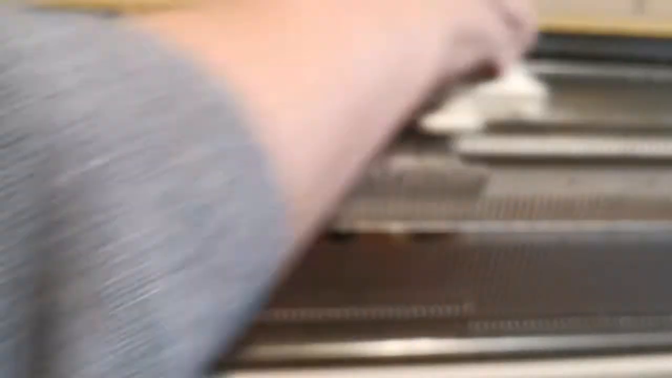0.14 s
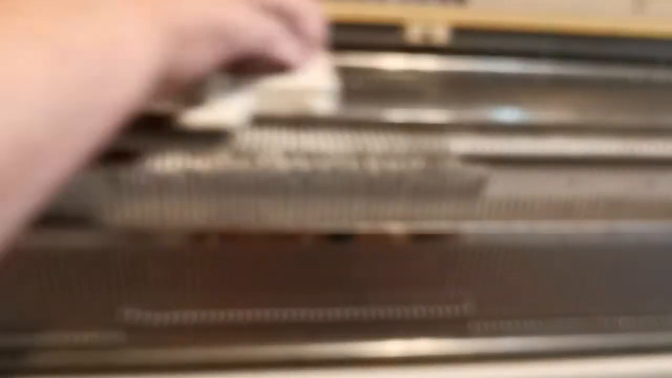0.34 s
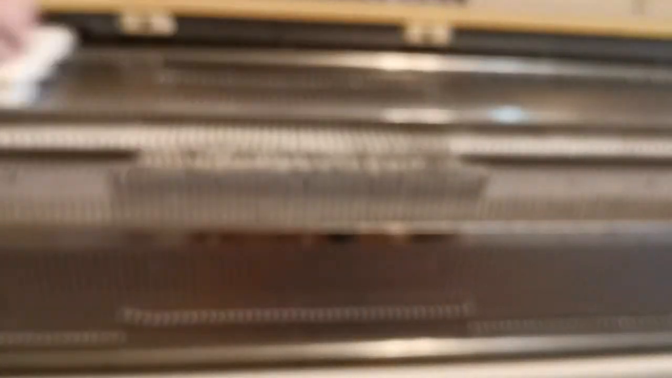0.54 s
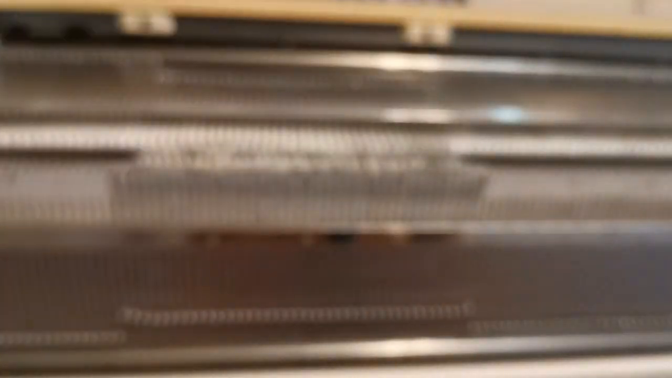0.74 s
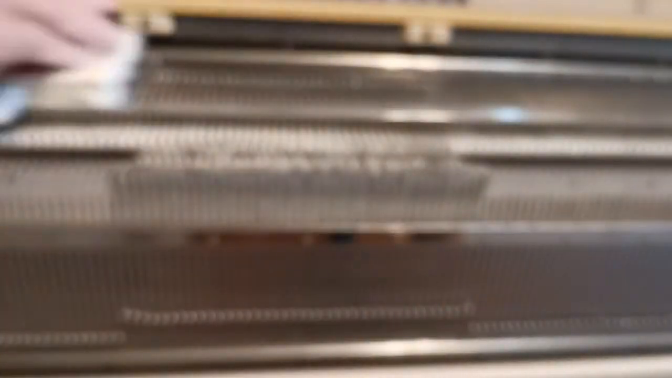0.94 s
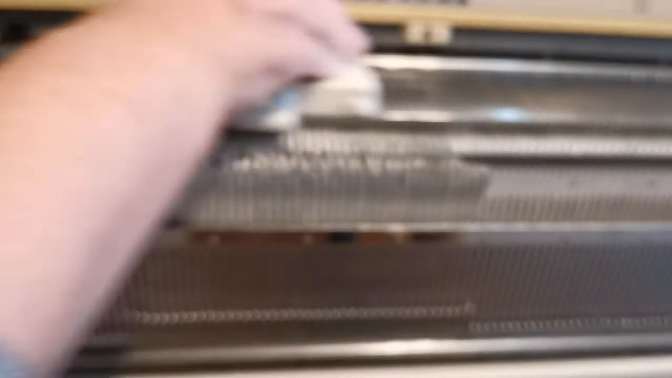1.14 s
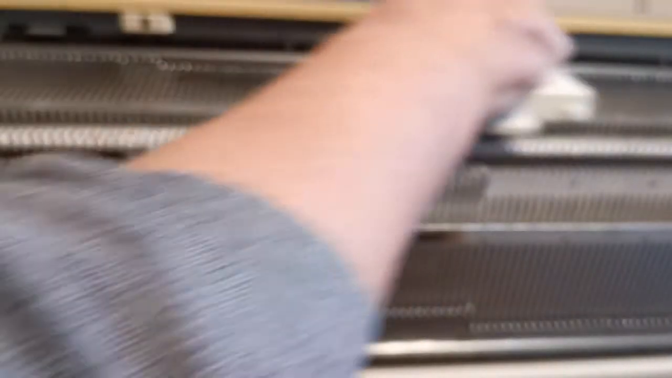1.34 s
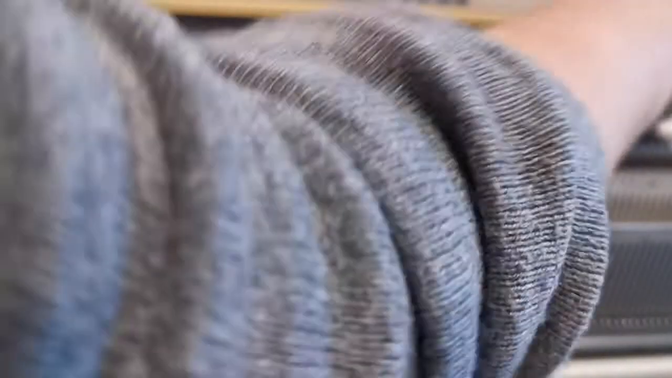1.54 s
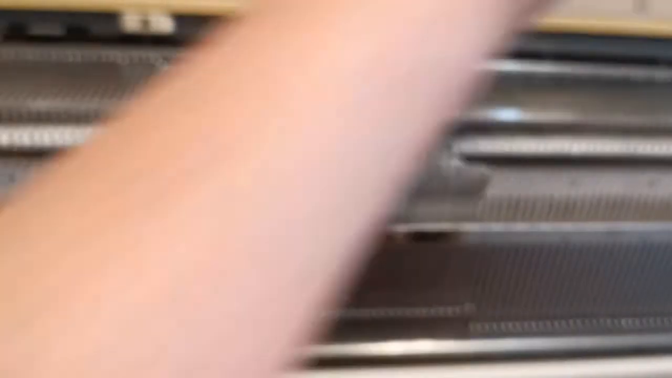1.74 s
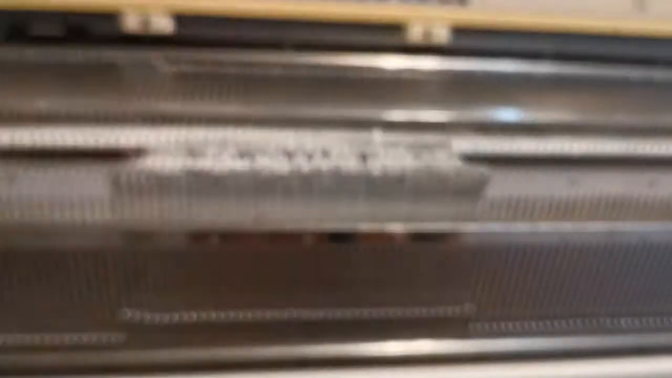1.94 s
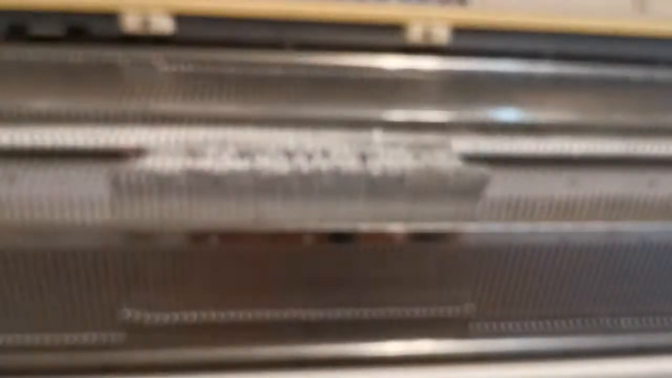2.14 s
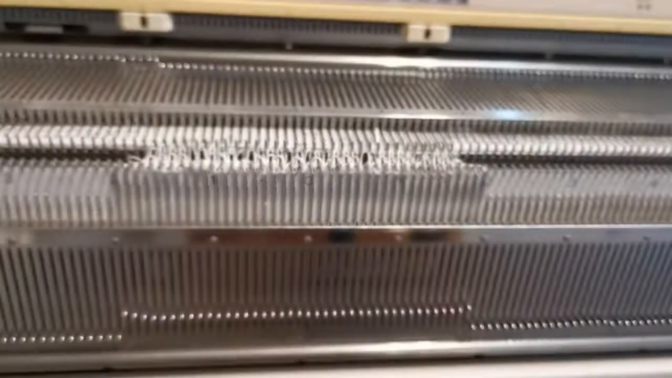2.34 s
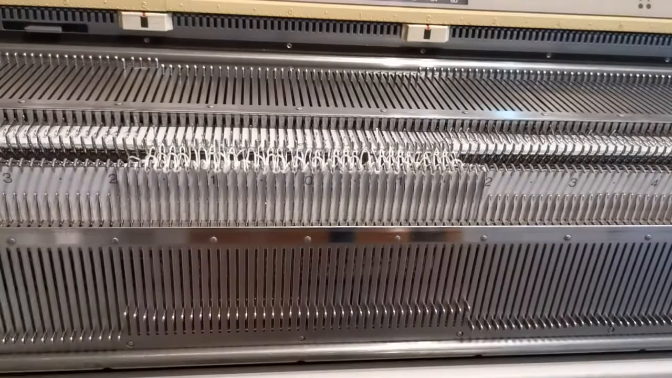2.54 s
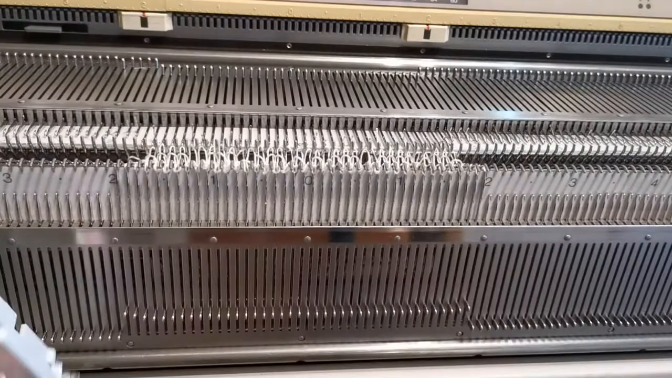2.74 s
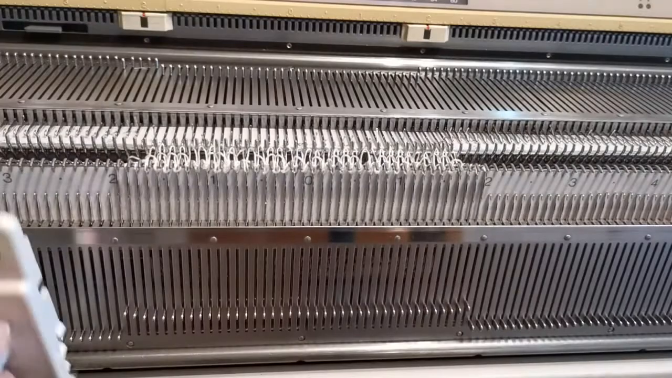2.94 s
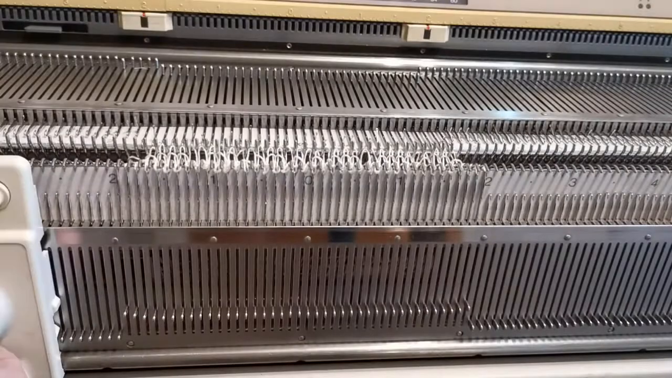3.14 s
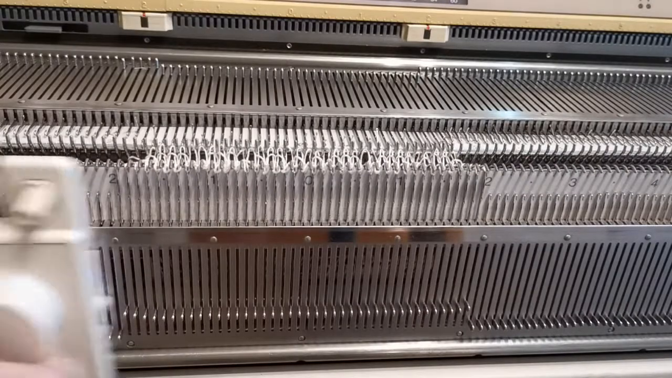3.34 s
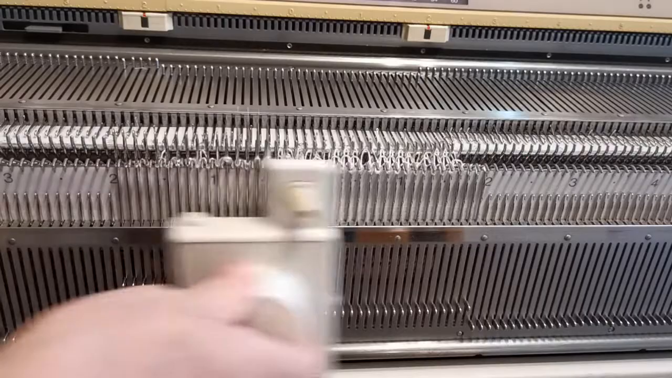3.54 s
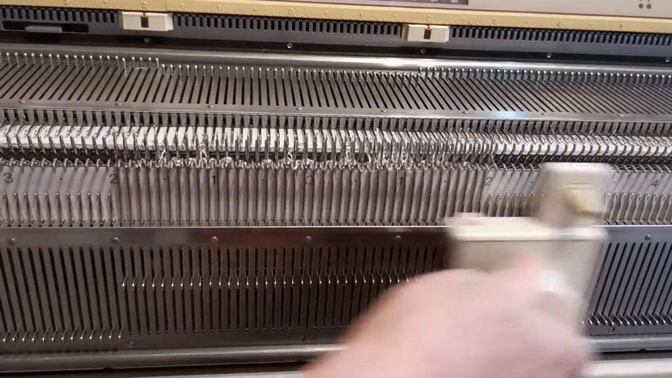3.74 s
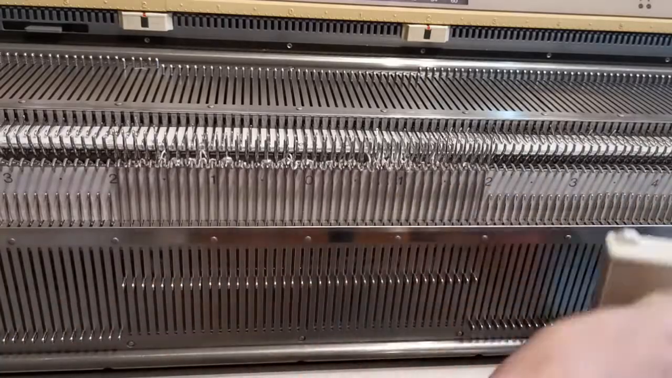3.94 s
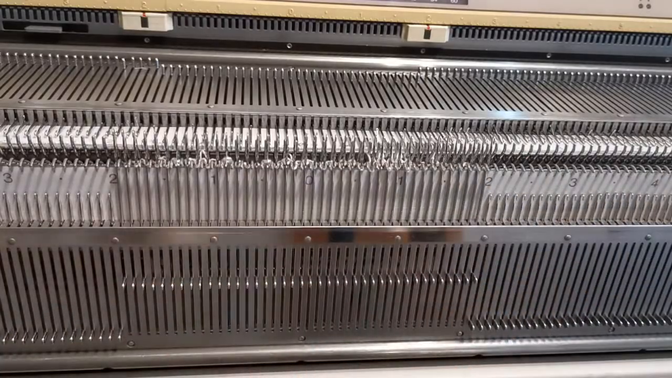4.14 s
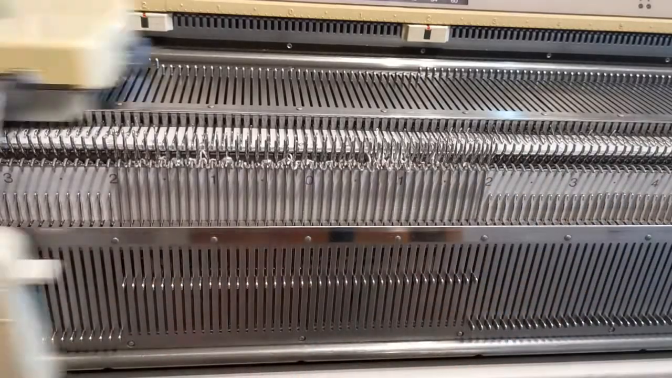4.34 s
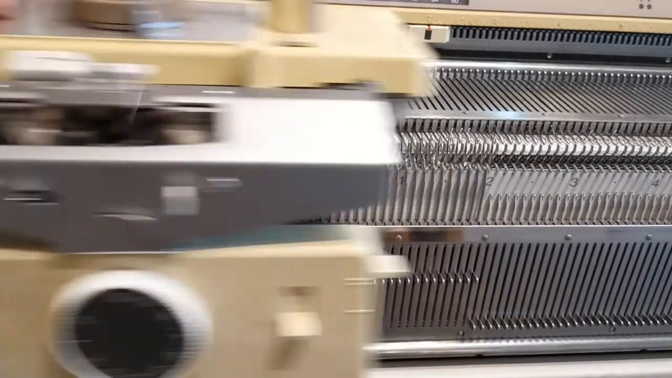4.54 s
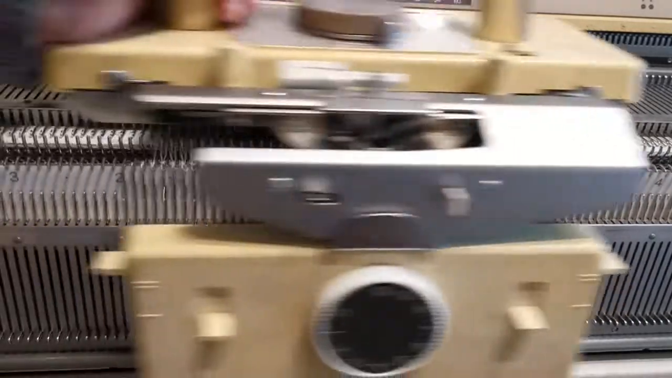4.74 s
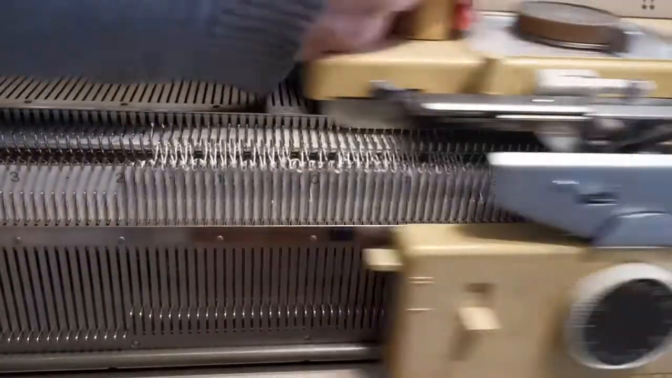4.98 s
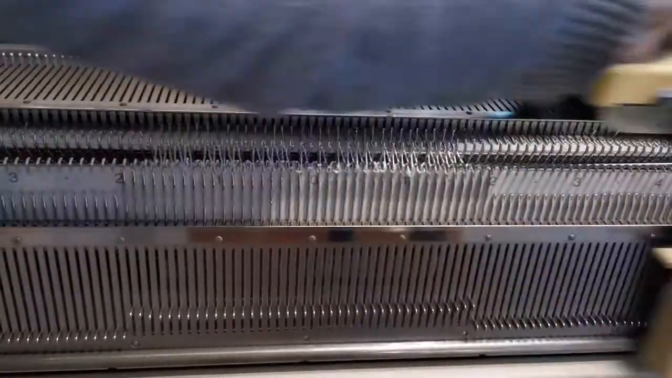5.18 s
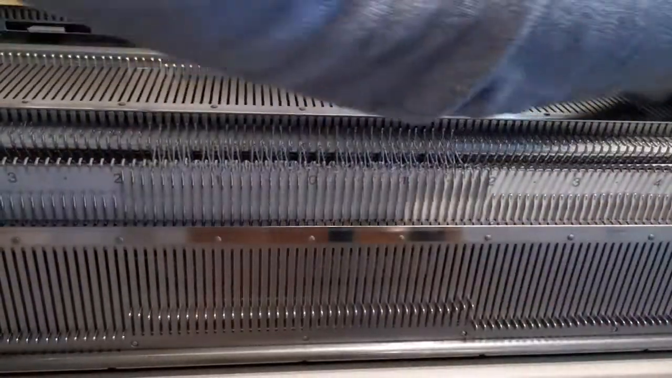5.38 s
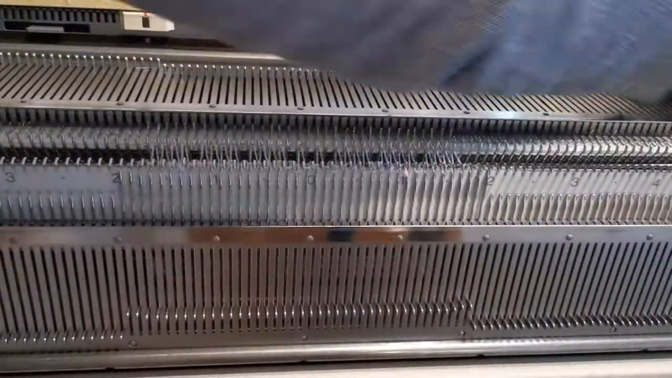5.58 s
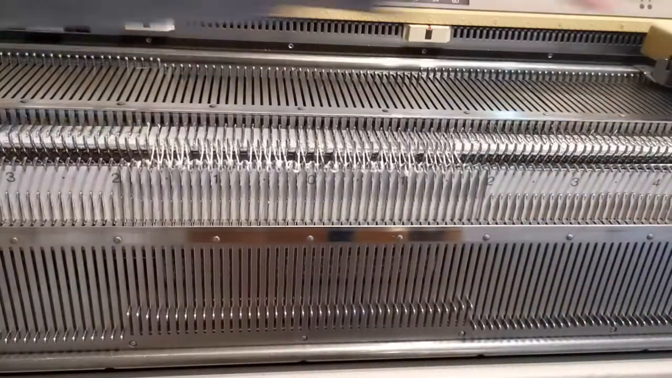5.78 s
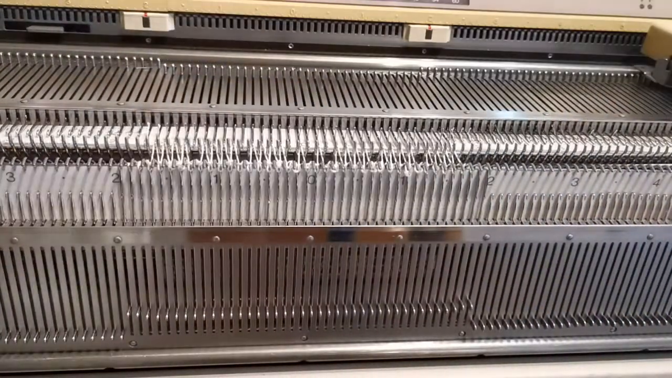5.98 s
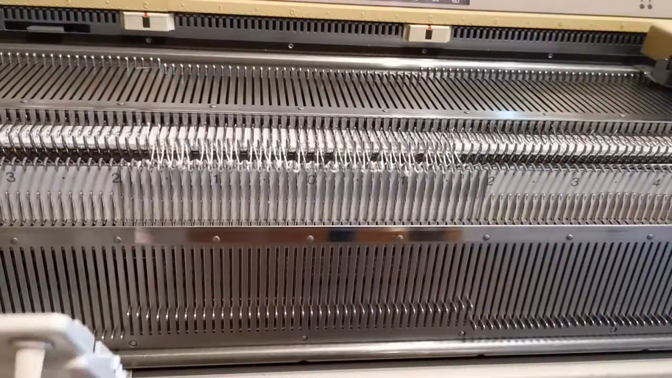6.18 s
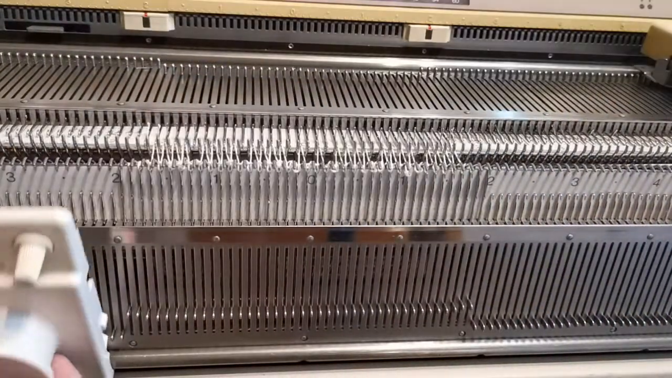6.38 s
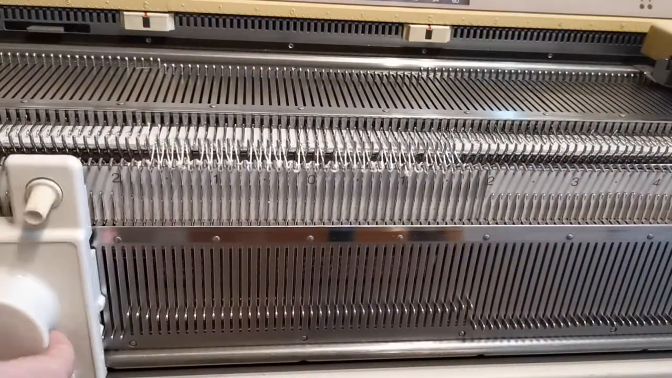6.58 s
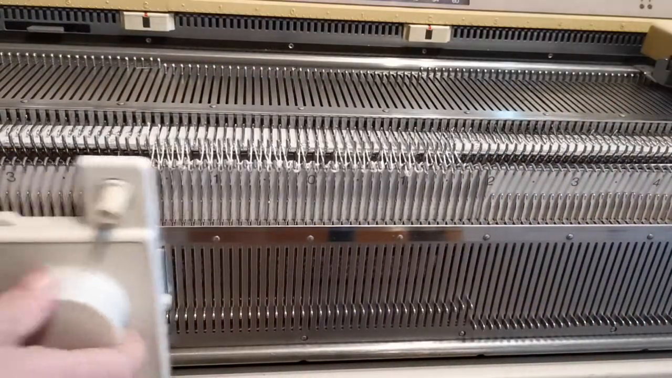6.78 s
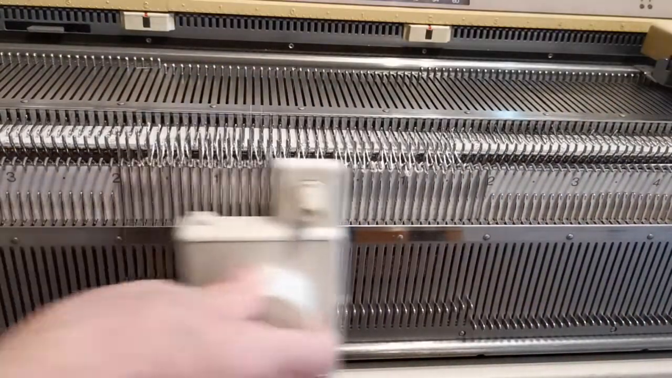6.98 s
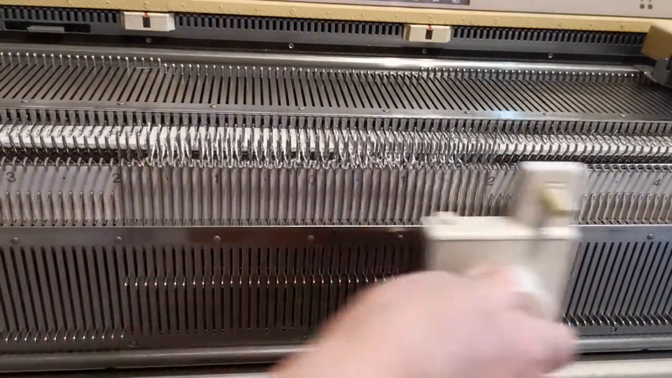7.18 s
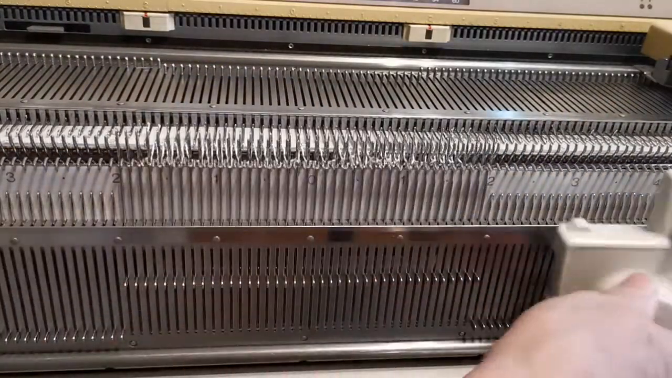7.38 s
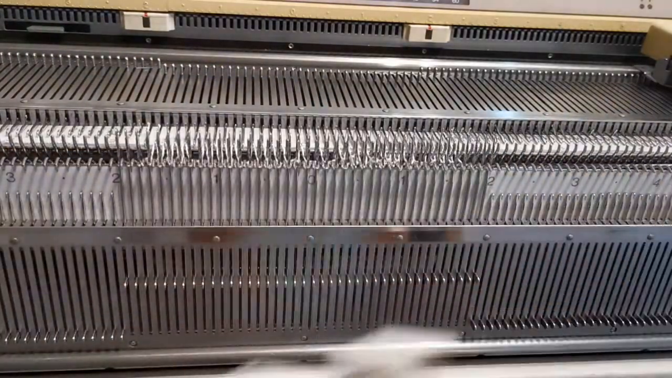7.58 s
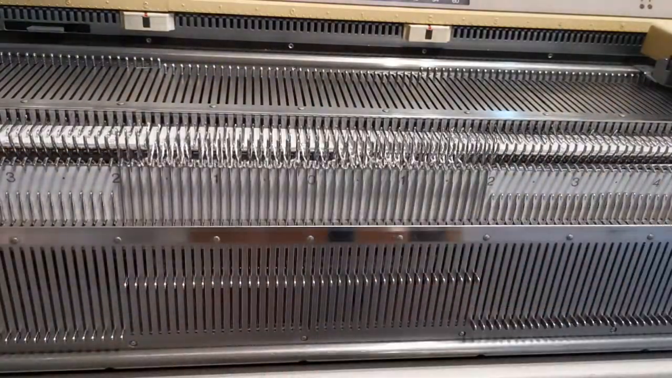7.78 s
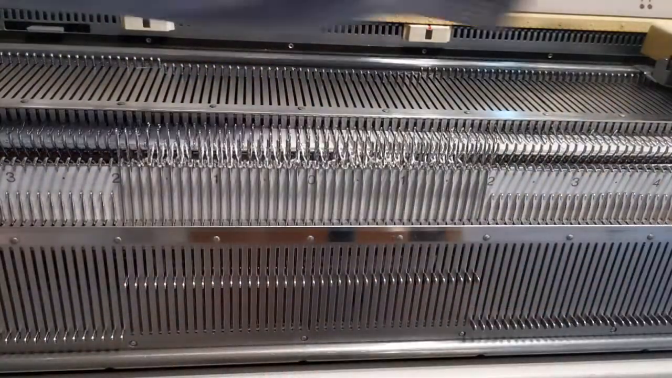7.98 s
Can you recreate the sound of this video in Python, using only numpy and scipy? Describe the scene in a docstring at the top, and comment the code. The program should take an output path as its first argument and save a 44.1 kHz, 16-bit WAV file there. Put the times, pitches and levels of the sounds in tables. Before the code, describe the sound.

A quiet workroom, miked closely in stereo with short reflections. A soft hiss and faint rubs open, then from 0.25 to 0.55 s a carriage rasps over steel needles, a bright, fast ratcheting buzz with rattling casing and low drone. A click and small clack fall at 0.76 s. A second rasp runs 1.1-1.4 s. Light knocks and faint hisses follow; from 2.7 to 3.2 s come hollow plastic bumps, sharp clacks and short metallic rings. A third, strong stroke zips by at 3.5-3.8 s. Around 4.45 s small knocks lead into the heavy carriage, grinding loudly from 4.5 to 5.1 s with growl and table rumble, fading by 5.3 s; a click sounds at 5.16 s and a muted thud and boom at 5.6 s. Knocks at 6.27-6.4 s, a hard clack at 6.59 s and clicks near 6.9 s precede the last rasp, 6.95-7.3 s. Slight clacks at 7.47 s, then near silence until 8 s.

```python
"""A soft hiss fades in a quiet workroom, then come faint rubs and a carriage rasping along a knitting machine.
Carriages are pushed by hand over the steel needle bed; their cams flick up to about 150 needles a second.
Needles and casing are bursts of noise through filters, the bed drones at the needle rate, and the rails rumble.
Between strokes a light plastic carriage is lifted off, knocked on the rail and latched on: noise and short rings.
The heavy main carriage passes once: it growls, sways the table and lands on its stop with a thud and a boom."""
import sys
import numpy as np
from scipy import signal
from scipy.fft import rfft, irfft, next_fast_len
from scipy.io import wavfile

SR = 44100
rng = np.random.default_rng(int(sys.argv[2]) if len(sys.argv) > 2 else 0)


def master(y):
    """Save y as 16-bit WAV."""
    cut = np.clip(np.atleast_2d(y).T, -1, 1)
    pcm = np.round(cut * 32767)  # scale
    wavfile.write(sys.argv[1], SR, pcm.astype(np.int16))


N = 353682
TIME = np.arange(N) / SR  # seconds

# Tones that the bed and its case ring with: f/Hz, relative level/dB, time to fall 60 dB t60/s
BED_MODES = [(133, -5.5, 0.16), (204, -2, 0.13), (378.3, -4.5, 0.22), (821.2, -1.5, 0.26), (996, -2.5, .15),
             (1147, -5, 0.1), (1480, -10.5, 0.03), (1800, -3, 0.048), (2784, 3.5, 0.037), (3850, -3, 0.11)]
# Tones of the needle latches: f/Hz, width/Hz, relative level/dB
LATCH_MODES = [(2730, 150, -5.5), (3800, 250, -11), (5300, 100, -4), (6800, 300, -11), (9150, 220, 4.5),
               (10020, 220, 0), (10580, 140, 6.5), (14460, 600, 1.5)]

# Tone colour of each noise: f/Hz, relative level per Hz/dB
# the needles
NEEDLE_COLOUR = [(1200, -23), (2400, -10.5), (3100, -5), (4200, -3), (4900, -5.5), (6300, -3.5),
                 (7700, -4.5), (8600, -1.5), (9500, 3), (10600, -2.5), (12200, -4), (14200, 0.5),
                 (16500, -21)]
# the clattering casing
CASING_COLOUR = [(120, -20.5), (260, -1), (520, -1), (680, 0.5), (900, 3.5), (1130, 1), (1350, -1),
                 (1800, 2), (2300, -1.5), (2800, 0.5), (4200, -2.5), (6000, -38), (16000, -34.5)]
# the rumbling rails
RUMBLE_COLOUR = [(25, -28), (55, -16.5), (85, -10.5), (110, -7), (137, 4.5), (200, -9.5), (260, -7.5),
                 (400, -5.5), (900, -39), (4000, -74)]
# the clack of a knock
KNOCK_COLOUR = [(150, -26), (500, -9), (1000, -4), (1500, -3.5), (2800, 0), (4200, -3), (5200, -8.5),
                (8000, -14.5), (16000, -30)]
# the sharp crack of a knock
CRACK_COLOUR = [(1500, -19), (4500, -7.5), (6500, -7), (9500, 1.5), (12000, -6), (16000, -7.5)]
# the thump through the table
THUMP_COLOUR = [(25, -12), (70, -8.5), (135, -6), (200, 1), (290, -5), (380, -4.5), (600, -5),
                (1500, -34.5), (6000, -69.5)]
# the swaying table
SWAY_COLOUR = [(22, -17), (38, -6), (51, 7), (68, -8), (86, 5.5), (125, -8), (200, -22), (800, -59.5)]
# the soft hisses
HISS_COLOUR = [(200, 19), (1500, 5.5), (3000, 9.5), (6000, -2.5), (9500, 3.5), (12000, -9), (16000, -16)]
# the growl of the heavy carriage
GROWL_COLOUR = [(120, -15.5), (250, -12), (385, 0), (470, -5), (640, -7), (950, -11), (1600, -17.5),
                (5000, -38.5)]
# the quiet room
ROOM_TONE = [(15, -36), (25, -8), (102, -3), (153, -9), (212, -1.5), (363, -7.5), (545, -15), (818, -19.5),
             (1400, -22.5), (2840, -24), (6740, -33.5), (14000, -29.5), (16000, -34.5)]

# How long reflections last in the workroom: f/Hz, time to fall 60 dB t60/s
ROOM_DECAY = [(100, 0.91), (300, 0.057), (1000, 0.38), (4000, 0.3), (8000, 0.26), (15000, 0.21)]
# Gain of the left-right difference: f/Hz, gain/dB
STEREO_WIDTH = [(50, -14), (160, -14.5), (350, -8), (700, -4), (1300, 0)]

# Soft hisses swell and fade: start t/s, end t/s, level/dB before they are made uneven
HISSES = [(0.0, 0.078, -58), (0.1, 0.294, -66), (0.999, 1.12, -64.5), (1.6, 1.783, -57.5),
          (2.05, 2.197, -68.5), (2.32, 2.68, -68), (7.922, 8.022, -73)]
# Rubs, squeals and hums of the moving carriage, as narrow bands of noise:
# start t/s, end t/s, f/Hz, width of each of two filters/Hz, direct level/dB
RUBS_AND_HUMS = [(0.125, 0.27, 1624, 490, -61), (0.249, 0.291, 1750, 202, -33),
                 (0.269, 0.4, 5330, 200, -32.5), (0.3, 0.593, 516, 89, -41),
                 (0.659, 0.699, 1635, 510, -46.5), (1.138, 1.39, 271.3, 16, -45.5),
                 (1.48, 1.604, 1670, 600, -58), (1.768, 1.914, 1004, 1200, -60.5),
                 (2.84, 2.888, 1540, 370, -27), (2.847, 2.883, 1037, 180, -25.5),
                 (4.184, 4.428, 1300, 280.6, -64.5), (5.453, 5.845, 963, 580, -59),
                 (6.863, 7.305, 1929, 167, -47.5)]
# Pushes of the light carriage: meets the needles t/s, reaches full level t/s, leaves them t/s, rasp level/dB,
# lead-in level relative to the rasp/dB, rail rumble level/dB (levels before mixing), full needle rate/(1/s)
PUSHES = [(0.252, 0.395, 0.53, -21.5, -6, -41, 137), (1.099, 1.126, 1.363, -22.5, -10, -43, 128),
          (3.491, 3.579, 3.818, -20, -6, -47, 149), (6.948, 7.005, 7.256, -21.5, -10.5, -51, 127)]
# The one pass of the heavy carriage: t/s, then rasp, clatter and rumble level/dB; each layer has its own gain
HEAVY_PASS = [(4.13, -64, -70, -80), (4.444, -50, -60.5, -82), (4.504, -29, -37.5, -62),
              (4.532, -27, -33, -55), (4.678, -20, -22, -44.5), (4.876, -24.5, -28.5, -35),
              (4.922, -24, -25, -32.5), (5.048, -36.5, -34, -32.5), (5.232, -32, -37, -41.5),
              (5.296, -64, -82.5, -58.5), (5.4, -67, -86, -66.5)]
# A steel cam clicks against a needle: t/s, level/dB before its mix
CLICKS = [(0.7569, -13), (2.0593, -44.5), (3.1597, -12), (4.3113, -33), (4.456, -27), (5.1627, -9),
          (5.225, -21), (6.8402, -21.5), (6.863, -18.5), (6.876, -15.5), (6.89, -16.5), (6.95, -27),
          (6.9853, -15.5)]
# The carriage clacks into its seat: t/s, level/dB, centre f/Hz of the struck part, level of its ring/dB
CLACKS = [(0.764, -19.5, 2045, -35.5), (1.6463, -31, 3890, -29.5), (2.358, -47.5, 2567, -38.5),
          (2.37, -53.5, 2690, -42.5), (2.5757, -35.5, 3320, -54), (2.8783, -9.5, 3993, -12),
          (3.0463, -11.5, 1846, -15), (3.0958, -21, 1207, -29), (3.1603, -7.5, 1173, -26),
          (3.399, -37.5, 1336, -45), (4.033, -35.5, 2340, -43.5), (4.4567, -34, 1085, -43),
          (5.597, -33, 1175, -35.5), (5.699, -49.5, 4100, -46), (6.2654, -25.5, 3870, -24),
          (6.3042, -19.5, 4180, -22), (6.3725, -22, 1152, -41.5), (6.5902, -7, 3210, -20),
          (7.464, -30.5, 2605, -43.5), (7.478, -37.5, 3740, -36)]
# The hollow plastic body bumps on the rail: t/s, level/dB, centre f/Hz of the struck part, thump level/dB
BUMPS = [(1.8419, -38.5, 1606, -46.5), (2.7176, -15.5, 1018, -30.5), (2.865, -15, 1076, -50),
         (2.9921, -21, 991, -38), (3.0032, -15.5, 1045, -38), (4.493, -28.5, 897, -47),
         (5.4638, -40, 994, -48.5), (5.5964, -36, 880, -38), (6.2656, -20.5, 1016, -29)]
# Steel catches ring on after a knock: t/s, centre f/Hz, level/dB, cycles to fall 60 dB
CATCHES = [(2.88, 4040, -22.5, 500), (3.047, 2946, -5.5, 30), (5.465, 2020, -52, 170),
           (6.266, 2570, -29.5, 140)]

BACKGROUND_DB, CUTOFF_HZ, CLICK_HZ = -68.5, 16000, 3970
# The casing clatters below the rasp; casing and rails follow a share of its swing, and the rails build up slowly.
CLATTER_DB, CLATTER_FOLLOWS, RUMBLE_FOLLOWS, RUMBLE_BUILD_S = -10.5, 0.68, 1, 0.051
# A harder push is a faster one: the speed follows this share of the swing in dB.
SPEED_FOLLOWS, SLOWEST_NEEDLES_PER_S, HEAVY_NEEDLES_PER_S = 0.15, 65, 149
# The rasp starts quieter, then rises to full level over ENGAGE_S; past the last needle it dies away.
ENGAGE_S, RUN_OUT_DB_PER_S = 0.025, 245
# Growl and sway of the heavy carriage, relative to its rumble; the table settles slowly.
GROWL_DB, SWAY_DB, SETTLE_DB_PER_S = 1, -4, 67
# The heavy carriage runs into the end stop.
STOP_S, STOP_THUD_DB, STOP_BOOM_DB, STOP_SWAY_DB = 5.597, -30.5, -33.5, -37
# Loose parts rattle on: typical time between rebounds, level of the first, extra loss of each further one.
REBOUND_S, REBOUND_DB, REBOUND_LOSS_DB = 0.018, -15, 3.5
# What each kind of knock is made of, relative to its own level
CLICK_MIX = dict(clack_db=-7.5, ring_db=-13, thump_db=-30)
CLACK_MIX = dict(crack_db=-10, thump_db=-27)
BUMP_MIX = dict(clack_db=0, ring_db=-0.5, crack_db=-28.5, attack_s=0.003)


def from_db(db):
    """Turn decibels into a gain."""
    return 10 ** (np.asarray(db) / 20)


def rms_one(x):
    """Scale to an average (rms) strength of 1."""
    return x / np.sqrt(np.mean(x ** 2) + 1e-20)


def at_hz(points, hz):
    """Read a table between its points, on a log-frequency axis."""
    known_hz, values = np.transpose(points)
    return np.interp(np.log(np.maximum(hz, 1)), np.log(known_hz), values)


def convolve(x, response):
    """Let every sample set off the same response, keeping the length."""
    full = signal.oaconvolve(np.atleast_2d(x), np.atleast_2d(response), axes=-1)
    return full[:, :x.shape[-1]]


def colour(x, spectrum, size=4096):
    """Filter to a tone colour, without sound ahead of its cause (minimum phase) and with unit power gain."""
    hz = np.linspace(0, SR / 2, size // 2 + 1)
    cepstrum = irfft(np.log(from_db(at_hz(spectrum, hz))))
    # folding the cepstrum forward in time makes the phase minimal
    cepstrum[1:size // 2] *= 2
    response = irfft(np.exp(rfft(cepstrum[:size // 2], size)))
    return convolve(x, response / np.linalg.norm(response))


def resonate(x, hz, width_hz):
    """Pass a sound through one resonance, with gain 1 at its peak."""
    return signal.lfilter(*signal.iirpeak(hz, hz / width_hz, fs=SR), x)


def dying(t, t60):
    """Fade that falls 60 dB in t60 seconds."""
    return np.exp(-np.log(1000) * t / t60)


def drift(rate):
    """Random wandering of about unit size, with a new target so many times a second."""
    targets = rng.standard_normal(2000).clip(-2, 2)
    return np.interp(TIME * rate, np.arange(2000), targets)


def panned(left_db):
    """Left and right gains for a level difference."""
    return from_db(np.vstack([left_db / 2, -left_db / 2]))


def add(out, s, sound):
    """Mix a short sound in at a given time."""
    start = round(s * SR)
    out[:, start:start + sound.shape[1]] += sound[:, :N - start]


def quiet_room():
    """The room's steady background is coloured noise."""
    return from_db(BACKGROUND_DB) * colour(rng.standard_normal((2, N)), ROOM_TONE)


def soft_hisses():
    """Soft hisses are coloured noise that swells, fades and wavers in level."""
    swells = np.zeros((1, N))
    for start, end, db in HISSES:
        swell = signal.windows.tukey(round((end - start) * SR), .5)
        add(swells, start, from_db(db) * swell[None])
    uneven = from_db(0.77 * drift(57))
    return swells * uneven * colour(rng.standard_normal((2, N)), HISS_COLOUR)


def rubs_and_hums():
    """Rubs, squeals and hums of the moving carriage are narrow bands of noise, swelling and fading."""
    out = np.zeros((2, N))
    for start, end, hz, width_hz, db in RUBS_AND_HUMS:
        length = round((end - start) * SR)
        noise = rng.standard_normal((2, length))
        band = resonate(resonate(noise, hz, width_hz), hz, width_hz)
        add(out, start, from_db(db) * rms_one(band * signal.windows.tukey(length, .5)))
    return out


def workroom(x, first_echo_s, count=9):
    """Blurred reflections off the room, each band dying at its own pace; unit power gain in the middle range."""
    t = TIME[:int(.7 * SR)]
    edges = np.geomspace(40, 18000, count + 1)
    tail = 0
    for low, high in zip(edges, edges[1:]):
        band_filter = signal.butter(2, [low, high], "band", fs=SR, output="sos")
        band = signal.sosfilt(band_filter, rng.standard_normal((2, len(t))))
        tail = tail + band * dying(t, at_hz(ROOM_DECAY, np.sqrt(low * high)))
    # silent until the first echo, then building up
    arrival = np.clip(t / first_echo_s - 1, 0, 1)
    middle_size = np.linalg.norm(arrival * dying(t, at_hz(ROOM_DECAY, 1000)))
    return convolve(x, tail * arrival / middle_size)


def heavy_pass(rasp_db=-0.8, clatter_db=-0.77, rumble_db=-0.5):
    """Levels (dB) of the heavy carriage's rasp, clatter and rumble, each layer with its own overall gain."""
    s, *levels = np.transpose(HEAVY_PASS)
    gains_db = rasp_db, clatter_db, rumble_db
    return [np.interp(TIME, s, level + gain, -200, -200) for level, gain in zip(levels, gains_db)]


def effort():
    """Rasp, clatter and rumble (gains) and needle rate (per s) over all passes of both carriages."""
    rasp, clatter, rumble = (from_db(db) for db in heavy_pass())
    speed = HEAVY_NEEDLES_PER_S * (rasp / rasp.max()) ** SPEED_FOLLOWS
    for start, full, leaves, rasp_db, lead_in_db, rumble_db, needles_per_s in PUSHES:
        begun = TIME >= start
        build_up = 1 - np.exp(-np.maximum(TIME - start, 0) / RUMBLE_BUILD_S)
        lead_in = lead_in_db * np.clip((full - TIME) / ENGAGE_S, 0, 1)
        run_out = RUN_OUT_DB_PER_S * np.maximum(TIME - leaves, 0)
        swing_db = lead_in - run_out
        rasp = rasp + begun * from_db(rasp_db + swing_db)
        clatter = clatter + begun * from_db(rasp_db + CLATTER_DB + CLATTER_FOLLOWS * swing_db)
        rumble = rumble + build_up * from_db(rumble_db + RUMBLE_FOLLOWS * swing_db)
        speed = np.maximum(speed, begun * needles_per_s * from_db(SPEED_FOLLOWS * swing_db))
    return rasp, clatter, rumble, np.maximum(speed, SLOWEST_NEEDLES_PER_S)


def needle_hits(travel, t60, uneven_db=3.0, jitter=.1, slide=.5, cams=2):
    """Each cam meets one needle after another: brief bursts on top of sliding friction."""
    needles = np.arange(int(travel[-1]))
    energy = np.zeros(N)
    for _ in range(cams):
        chance = rng.standard_normal((len(needles), 2))
        # jitter is a share of the needle spacing
        place = needles + rng.random() + jitter * chance[:, 0]
        at = np.searchsorted(travel, place).clip(0, N - 1)
        energy[at] += from_db(uneven_db * chance[:, 1].clip(-2, 2)) ** 2
    energy = np.abs(convolve(energy, dying(TIME[:SR // 10], t60) ** 2))
    strength = np.sqrt(energy / energy.mean() + slide)
    return rms_one(strength * rng.standard_normal((2, N)))


def bed(force):
    """A force sets the bed ringing in several fading tones, with its own phases on each side."""
    t = TIME[:SR // 2]
    phases = rng.uniform(0, 2 * np.pi, (len(BED_MODES), 2, 1))
    response = 0
    for (hz, db, t60), phase in zip(BED_MODES, phases):
        ring = dying(t, t60) * np.sin(2 * np.pi * hz * t + phase)
        response = response + from_db(db) / np.sqrt(t60) * ring
    return convolve(force, response / np.linalg.norm(response[0]))


def strokes():
    """Needles tick and their latches ring, the casing clatters with them, and the bed drones."""
    rasp, clatter, rumble, speed = effort()
    travel = np.cumsum(speed) / SR  # needles passed so far
    # the working needles lie a little to the left
    side = panned(0.51)
    rasp, clatter = side * rasp, side * clatter
    # some needles bind more than others, so the push is uneven
    binding = from_db(1.1 * drift(60))
    ticks = binding * needle_hits(travel, t60=.032)
    rattle = binding * needle_hits(travel, t60=.036)
    # no two needles are alike, so each latch resonance comes and goes
    latches = 0
    for hz, width_hz, db in LATCH_MODES:
        wavering = from_db(db + 6.2 * drift(30))
        latches = latches + wavering * rms_one(resonate(ticks, hz, width_hz))
    needles = from_db(0.8) * colour(ticks * rasp, NEEDLE_COLOUR)
    needles = needles + from_db(-11.0) * rasp * rms_one(latches)
    casing_force = rattle * clatter
    casing = from_db(0.83) * colour(casing_force, CASING_COLOUR) + from_db(-8.5) * bed(casing_force)
    # the bed booms when the needle rate meets its lowest mode
    drone = from_db(4.0) * resonate(np.sin(2 * np.pi * travel), hz=137.7, width_hz=6.6)
    octave = from_db(-8.0) * np.sin(4 * np.pi * travel)
    rails = rumble * (from_db(-4.5) * colour(rattle, RUMBLE_COLOUR) + drone + octave)
    return needles + casing + rails


def burst(t60, rise):
    """A contact is noise that builds quickly and chatters away."""
    t = TIME[:SR // 3]
    return rng.standard_normal((2, len(t))) * dying(t, t60) * (1 - np.exp(-t / rise))


def rattling(sound, count=3):
    """A contact is followed by a few unevenly spaced, weaker rebounds."""
    out = sound.copy()
    times = np.cumsum(REBOUND_S * (.5 + rng.random(count)))
    for k, s in enumerate(times):
        lag = round(s * SR)
        out[:, lag:] += from_db(REBOUND_DB - k * REBOUND_LOSS_DB) * sound[:, :-lag]
    return out


def struck_part(hz, spread, cycles, count=5):
    """A small plastic or steel part rings briefly in a cluster of close tones."""
    t = TIME[:SR // 3]
    modes_hz = hz * (1 + spread * (np.linspace(-1, 1, count) + rng.normal(0, 0.023, count)))
    weights = np.hanning(count + 2)[1:-1, None]
    phases = rng.uniform(0, 2 * np.pi, (count, 1)) + rng.normal(0, 1.0, (2, count, 1))
    envelope = dying(t, cycles / hz) * (1 - np.exp(-t * hz / 2.6))
    tones = weights * np.sin(2 * np.pi * modes_hz[:, None] * t + phases)
    ring = tones.sum(axis=1) * envelope
    # each side gets the energy of the envelope
    return ring * np.linalg.norm(envelope) / np.linalg.norm(ring, axis=1, keepdims=True)


def knock(level_db, hz, clack_db=0, ring_db=0, crack_db=0, thump_db=0, attack_s=0.0012):
    """One knock as its four short sounds: clack, ringing part, crack and thump."""
    part = struck_part(hz, spread=.22, cycles=100, count=11)
    # the low plastic parts also give an overtone
    if hz < 1500:
        part = part + from_db(-9.0) * struck_part(2.8 * hz, spread=0.048, cycles=60)
    clack = rattling(burst(t60=0.028, rise=attack_s))
    crack = burst(t60=0.028, rise=0.00083)
    thump = burst(t60=0.28, rise=0.0099)
    levels = clack_db, ring_db, crack_db, thump_db
    return [from_db(level_db + db) * sound for db, sound in zip(levels, (clack, part, crack, thump))]


def knocks():
    """Each knock has a clack, a ringing part, a sharp crack and a thump through the table, and wakes the bed."""
    layers = np.zeros((4, 2, N))
    events = [(s, knock(db, CLICK_HZ, **CLICK_MIX)) for s, db in CLICKS]
    events += [(s, knock(db, hz, ring_db=ring_db - db, **CLACK_MIX)) for s, db, hz, ring_db in CLACKS]
    events += [(s, knock(db, hz, thump_db=thump_db - db, **BUMP_MIX)) for s, db, hz, thump_db in BUMPS]
    for s, sounds in events:
        for layer, sound in zip(layers, sounds):
            add(layer, s, sound)
    clack, part, crack, thump = layers
    for s, hz, db, cycles in CATCHES:
        add(part, s, from_db(db) * struck_part(hz, spread=0.018, cycles=cycles))
    direct = from_db(-2.0) * colour(clack, KNOCK_COLOUR) + part
    direct = direct + from_db(-2.0) * colour(crack, CRACK_COLOUR)
    thump = colour(thump, THUMP_COLOUR)
    upper = panned(2.7) * (direct + from_db(-14.0) * bed(clack))
    return upper + from_db(-0.5) * thump + from_db(-11.5) * bed(thump)


def sway():
    """The heavy carriage growls along its rail and shakes the table, which settles slowly."""
    load = from_db(heavy_pass()[2])
    settling = from_db(-SETTLE_DB_PER_S * TIME)
    # shaking rises with the load but falls no faster than the table settles
    shaking = np.maximum.accumulate(load / settling) * settling
    table = from_db(SWAY_DB) * shaking * colour(rng.standard_normal((2, N)), SWAY_COLOUR)
    growl = from_db(GROWL_DB) * load * colour(rng.standard_normal((2, N)), GROWL_COLOUR)
    return table + growl


def end_stop(thud_rise_s=0.016, thud_t60=0.4, swell_s=0.053, swell_t60=0.38):
    """The heavy carriage lands on its stop: a quick thud in the rail, a slower boom of the bed and table sway."""
    since = np.maximum(TIME - STOP_S, 0)
    thud = (1 - np.exp(-since / thud_rise_s)) * dying(since, thud_t60)
    swell = (1 - np.exp(-since / swell_s)) * dying(np.maximum(since - swell_s, 0), swell_t60)
    noise = rng.standard_normal((3, 2, N))
    rail = from_db(STOP_THUD_DB) * colour(noise[0], GROWL_COLOUR)
    ringing = resonate(resonate(noise[1], hz=150.4, width_hz=120), hz=150.4, width_hz=120)
    boom = from_db(STOP_BOOM_DB) * rms_one(ringing)
    table = from_db(STOP_SWAY_DB) * colour(noise[2], SWAY_COLOUR)
    return thud * rail + swell * (boom + table)


def scene():
    """The machine close by, its reflections, soft hisses, and the quiet room."""
    pushes = strokes()
    blows_and_rubs = knocks() + rubs_and_hums()
    reflections = workroom(from_db(-7.0) * pushes + from_db(-2.5) * blows_and_rubs, first_echo_s=0.0012)
    machine = pushes + blows_and_rubs + sway() + end_stop()
    return quiet_room() + soft_hisses() + machine + reflections


def record(dry):
    """Two close microphones hear the bass nearly alike; peaks are rounded and the top is cut."""
    mid, side = (dry[0] + dry[1]) / 2, (dry[0] - dry[1]) / 2
    size = next_fast_len(N + SR)
    width = from_db(at_hz(STEREO_WIDTH, np.fft.rfftfreq(size, 1 / SR)))
    side = irfft(rfft(side, size) * width, size)[:N]
    rounded = 1.1 * np.tanh(np.array([mid + side, mid - side]) / 1.1)
    top_cut = signal.ellip(10, .1, 80, CUTOFF_HZ, fs=SR, output="sos")
    return signal.sosfilt(top_cut, rounded)


dry = scene()
out = record(dry)
master(out)
```